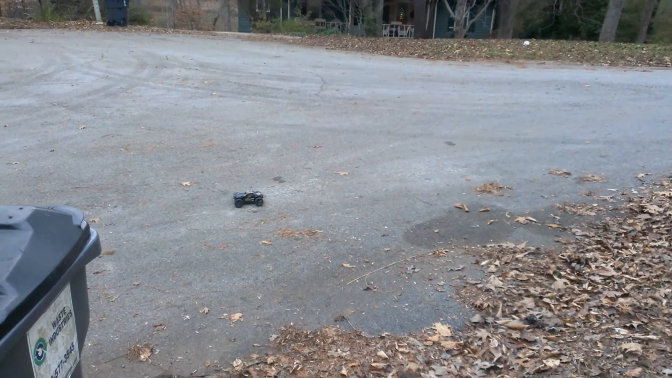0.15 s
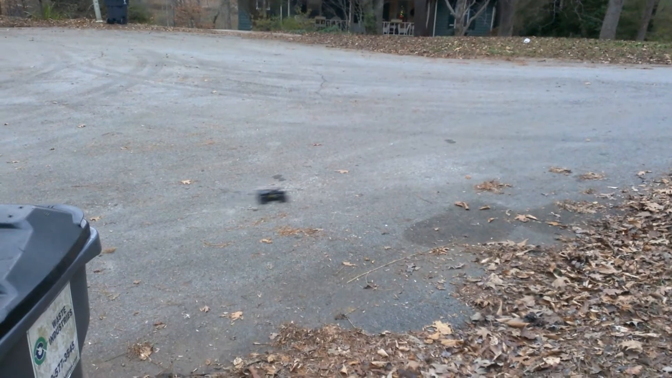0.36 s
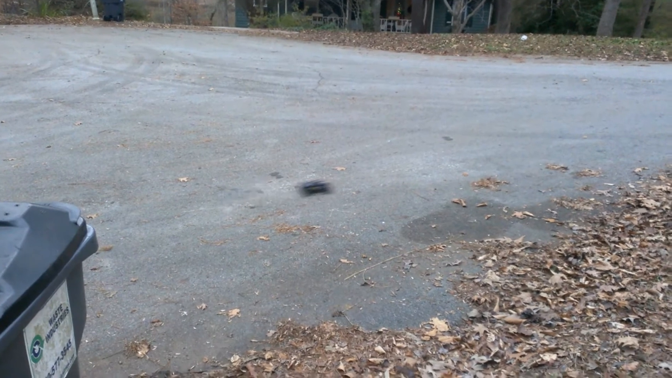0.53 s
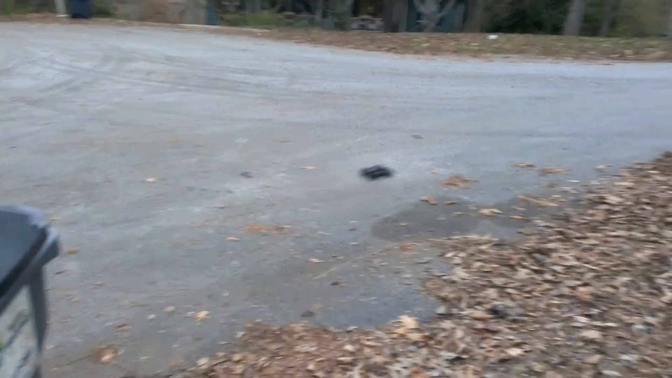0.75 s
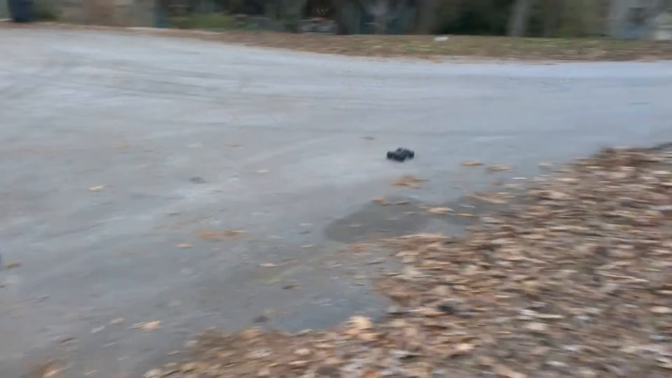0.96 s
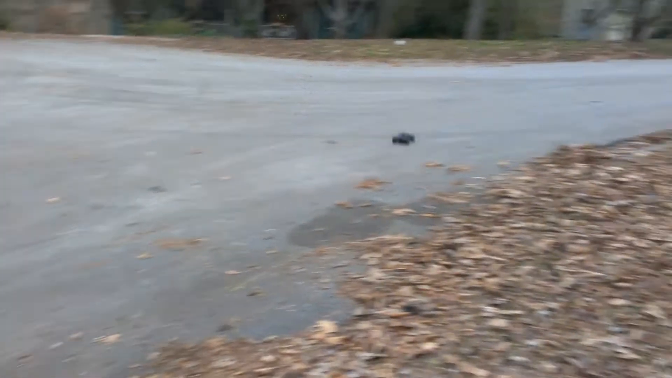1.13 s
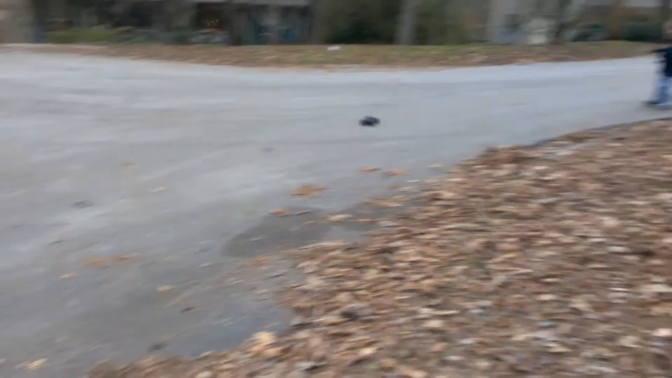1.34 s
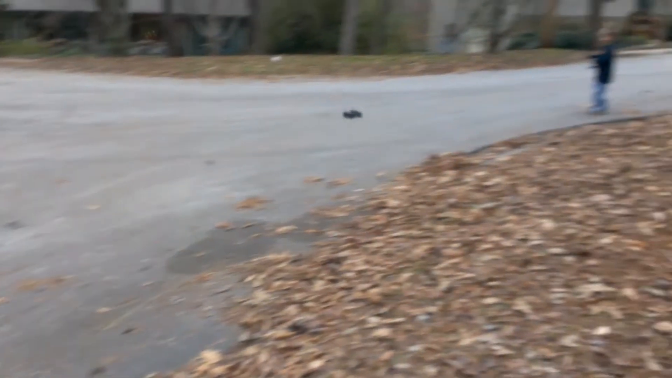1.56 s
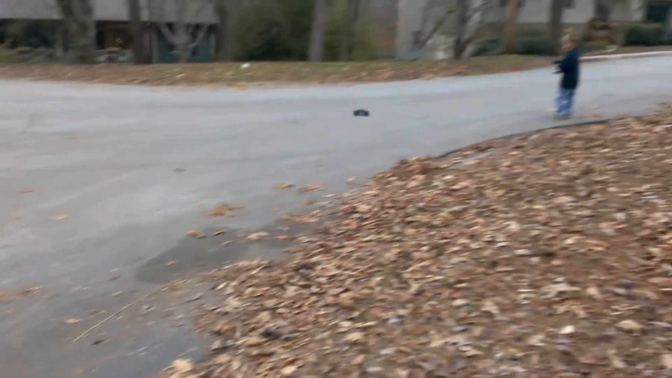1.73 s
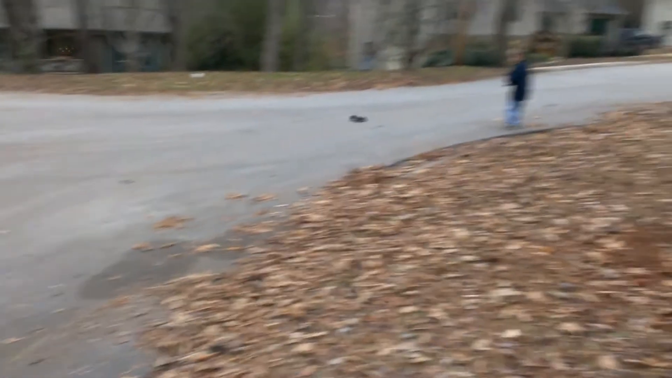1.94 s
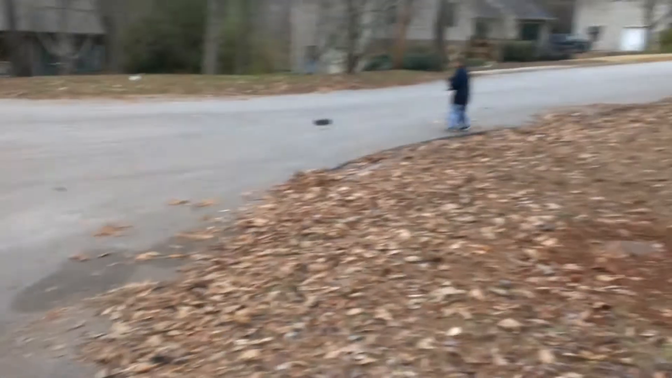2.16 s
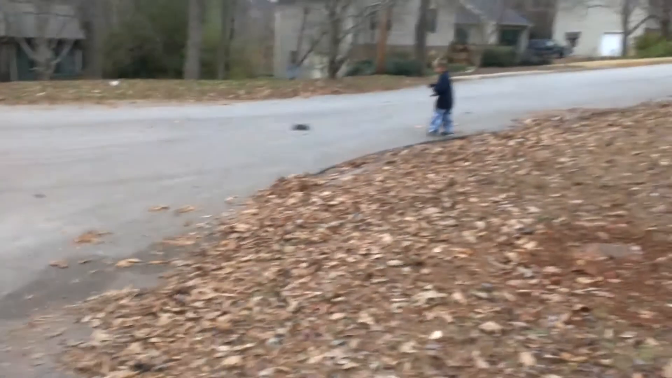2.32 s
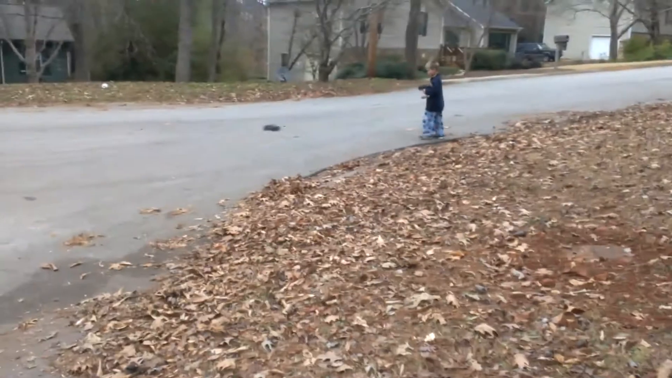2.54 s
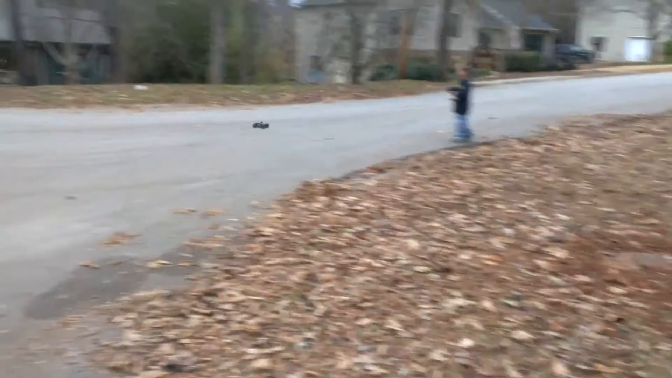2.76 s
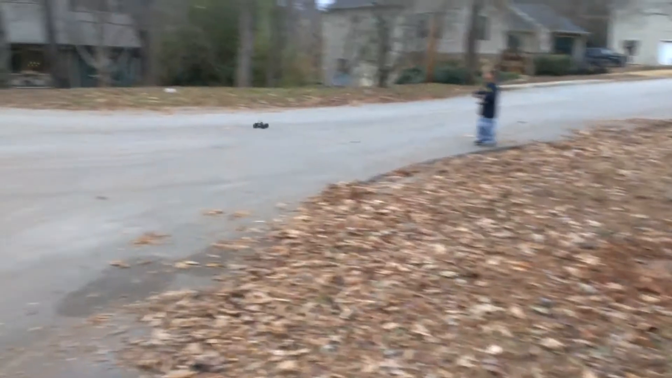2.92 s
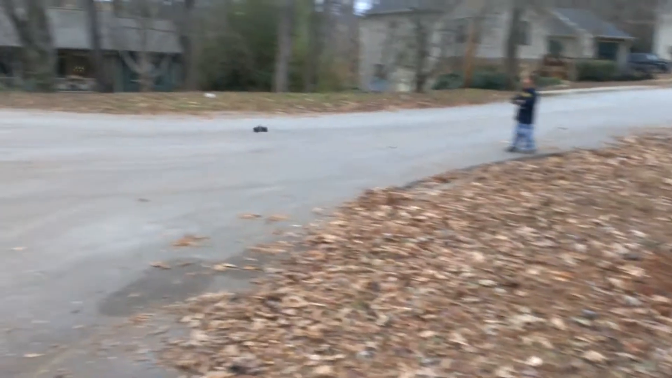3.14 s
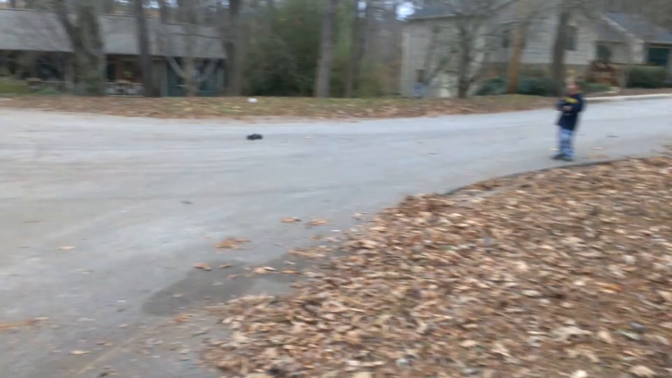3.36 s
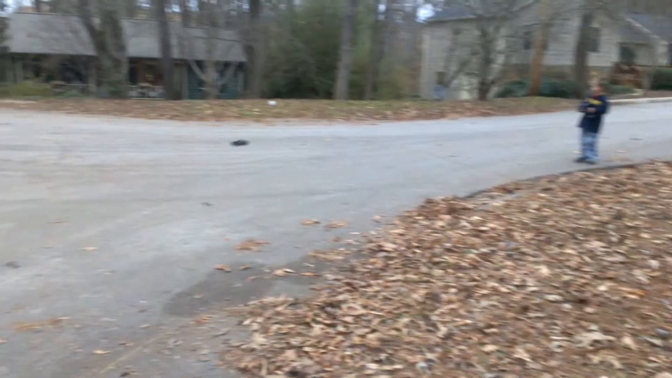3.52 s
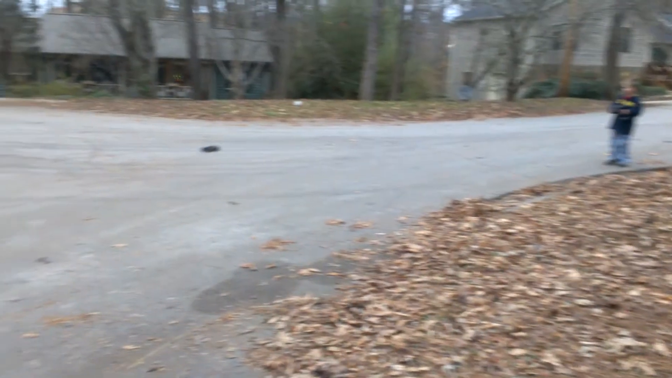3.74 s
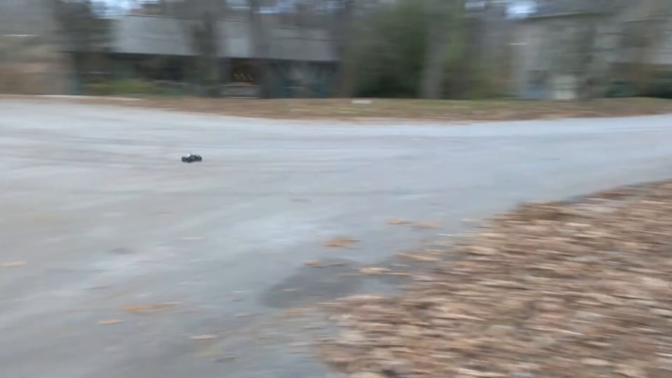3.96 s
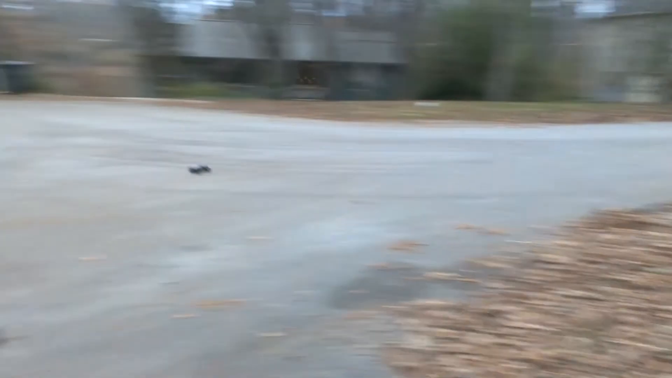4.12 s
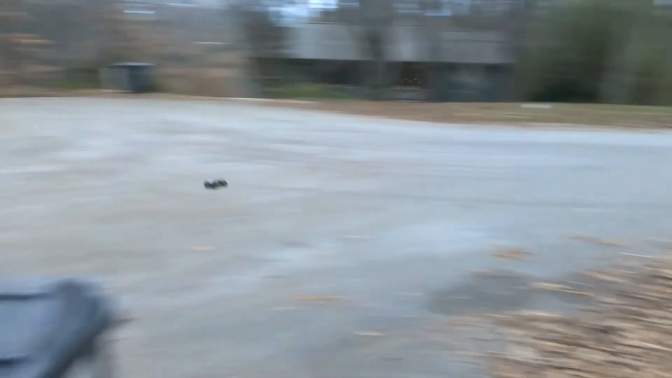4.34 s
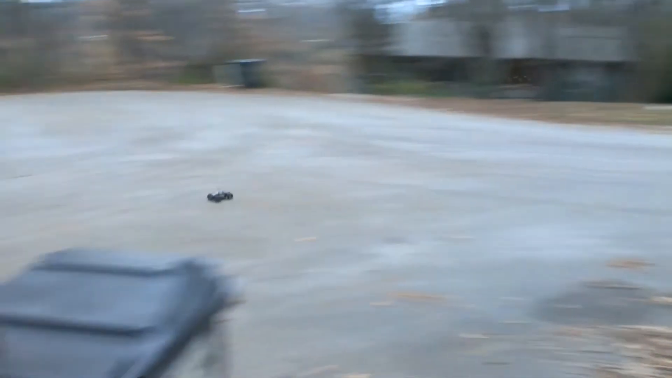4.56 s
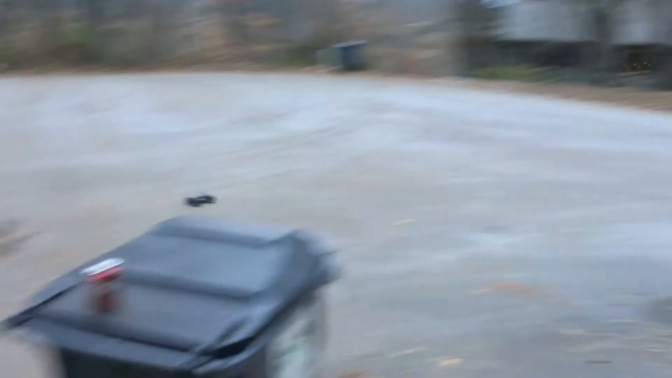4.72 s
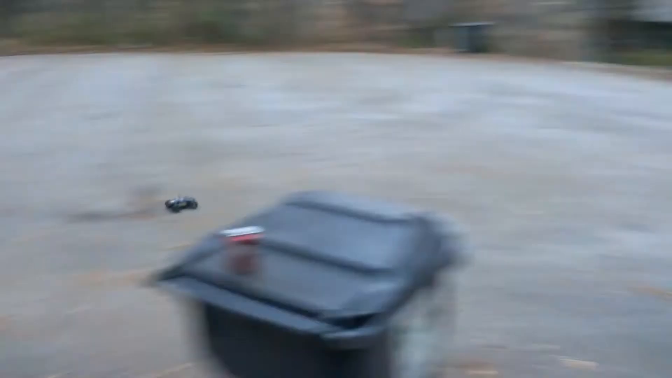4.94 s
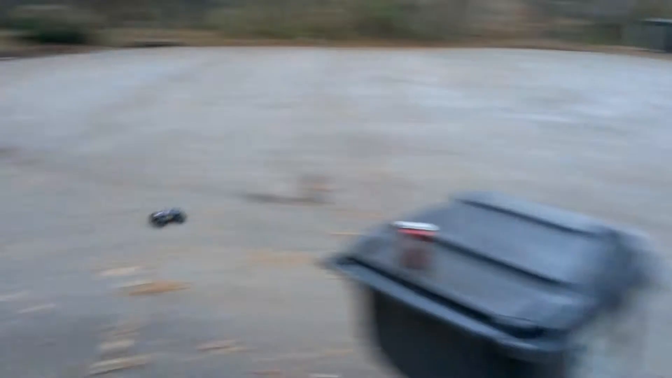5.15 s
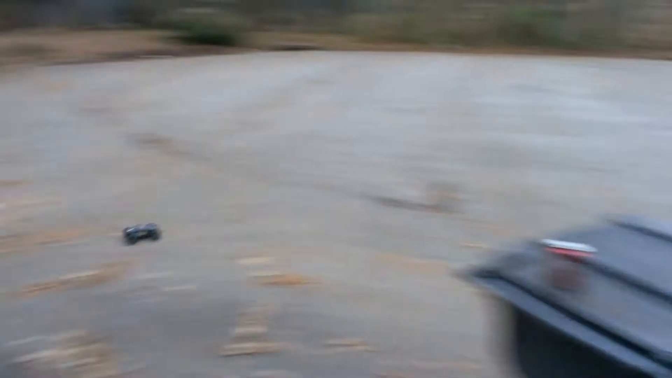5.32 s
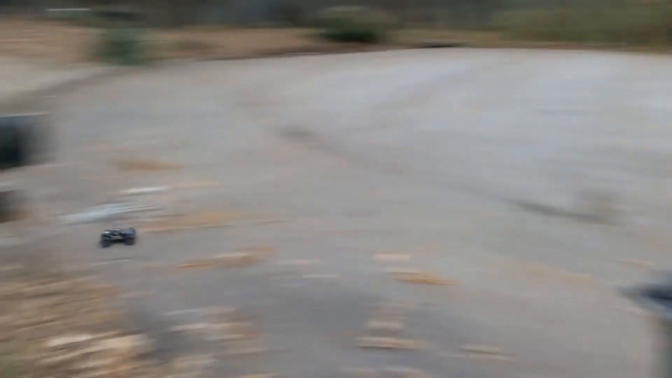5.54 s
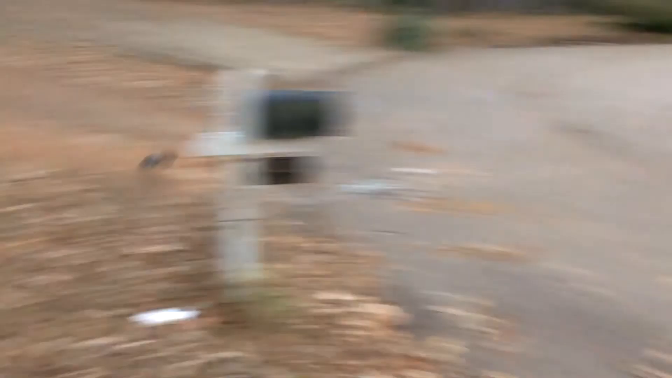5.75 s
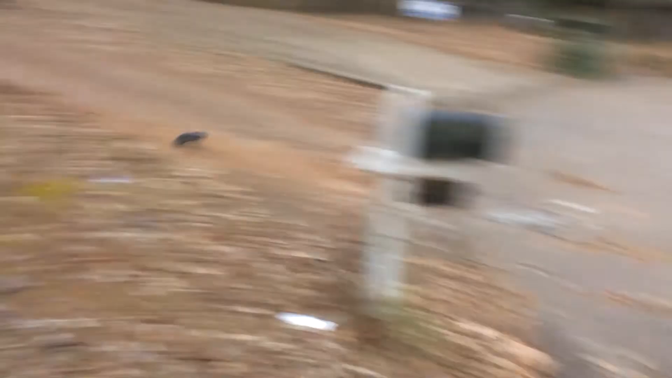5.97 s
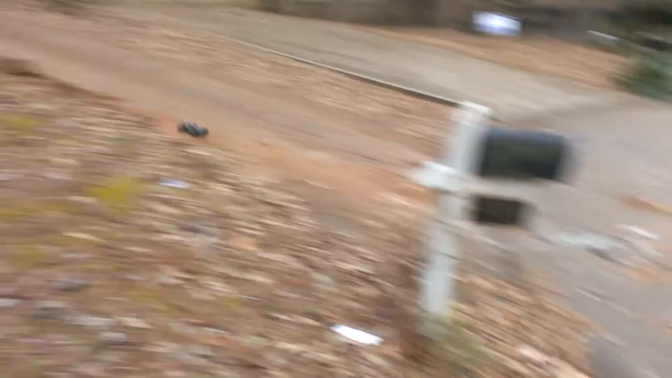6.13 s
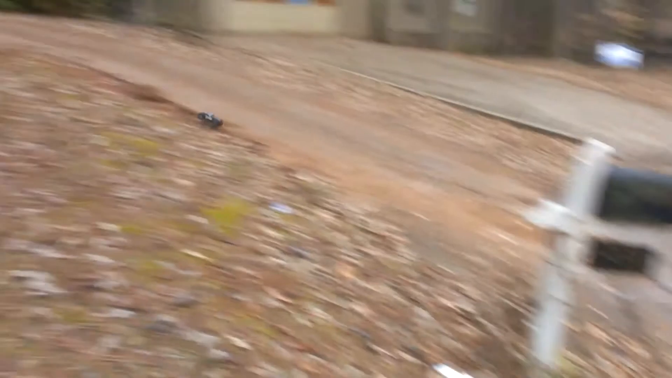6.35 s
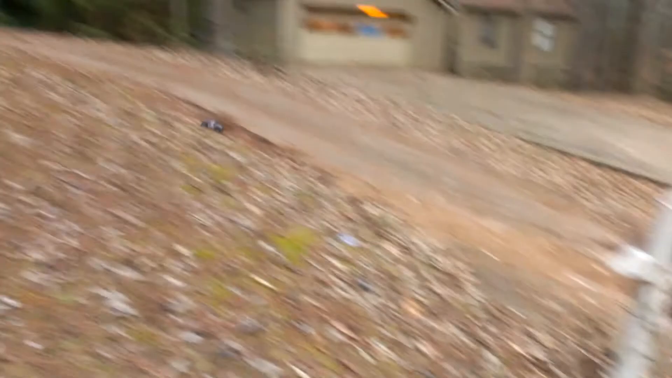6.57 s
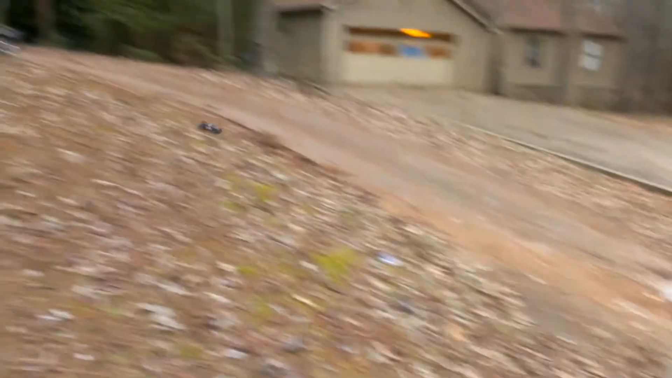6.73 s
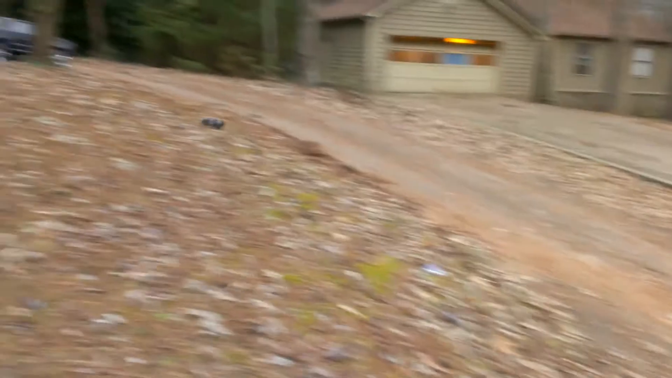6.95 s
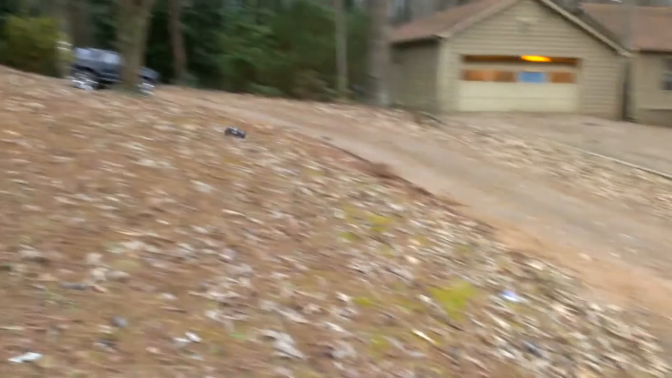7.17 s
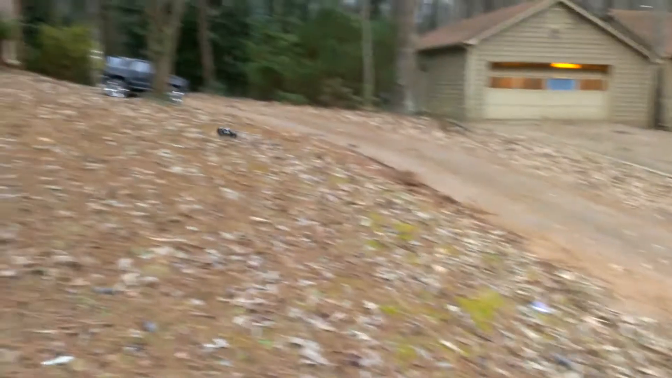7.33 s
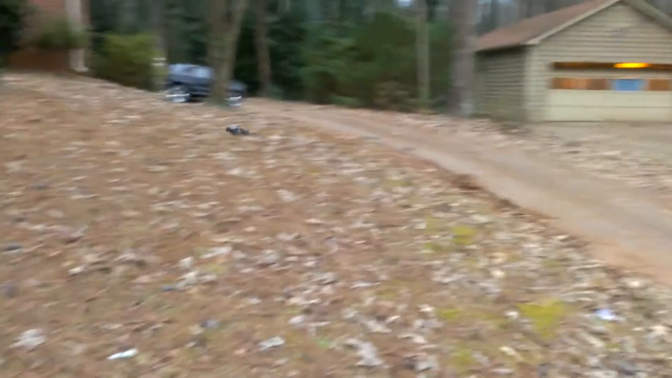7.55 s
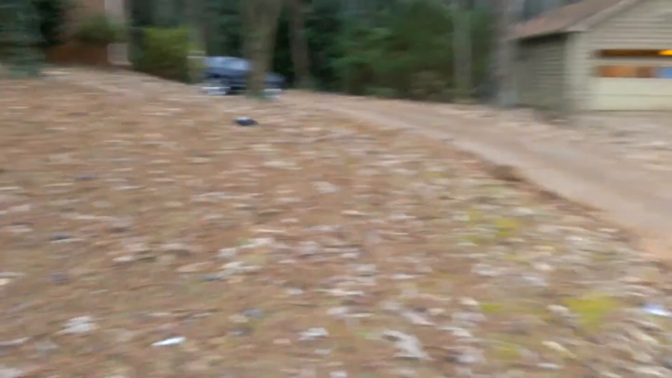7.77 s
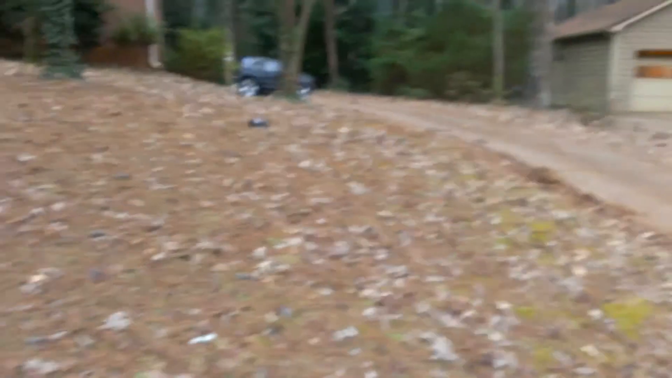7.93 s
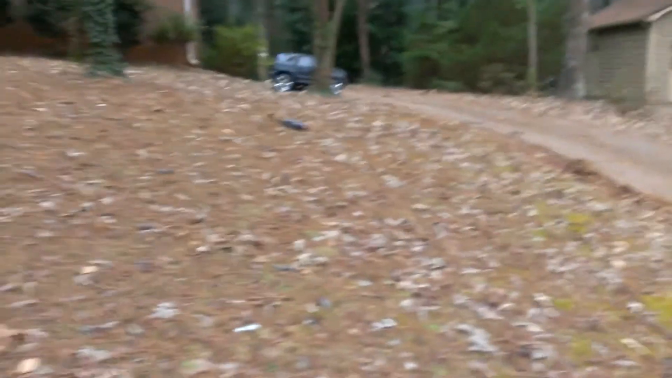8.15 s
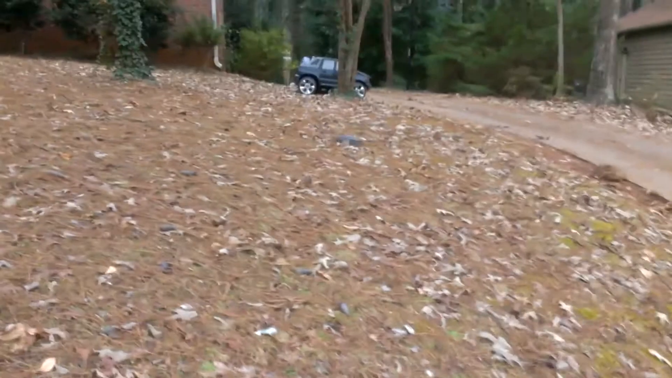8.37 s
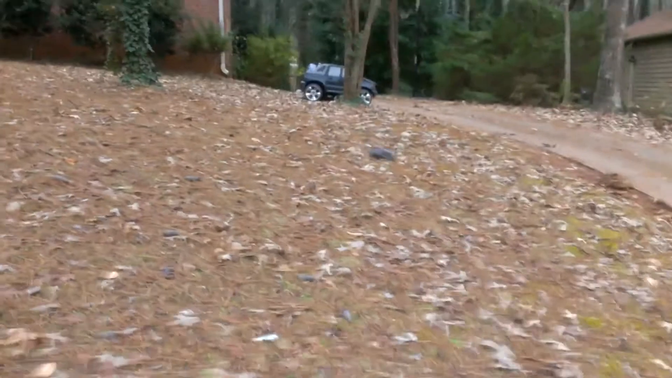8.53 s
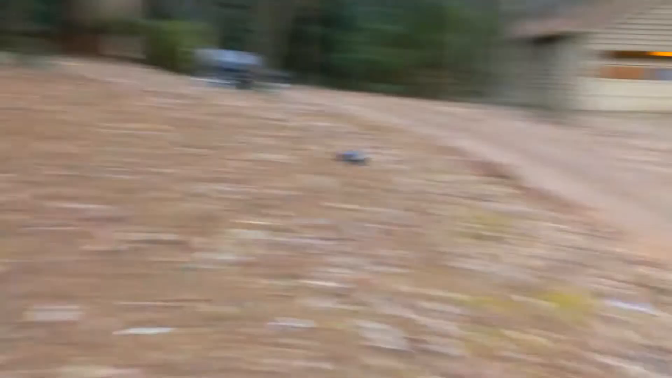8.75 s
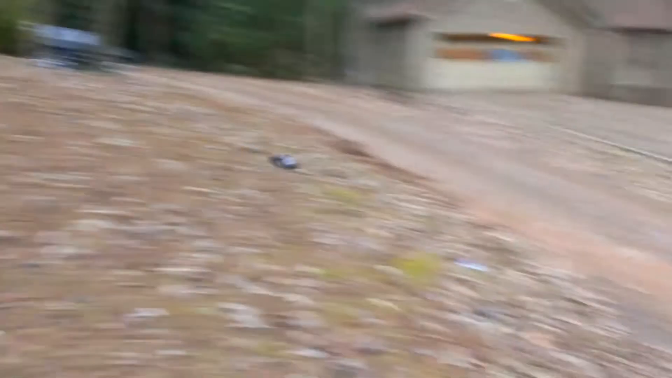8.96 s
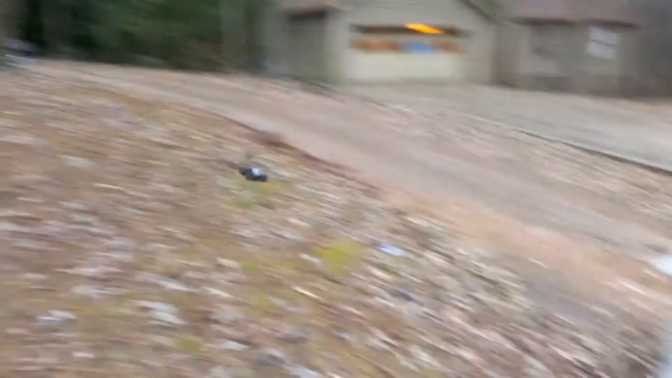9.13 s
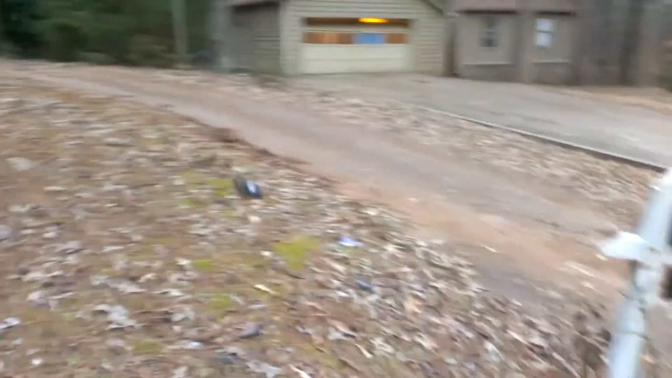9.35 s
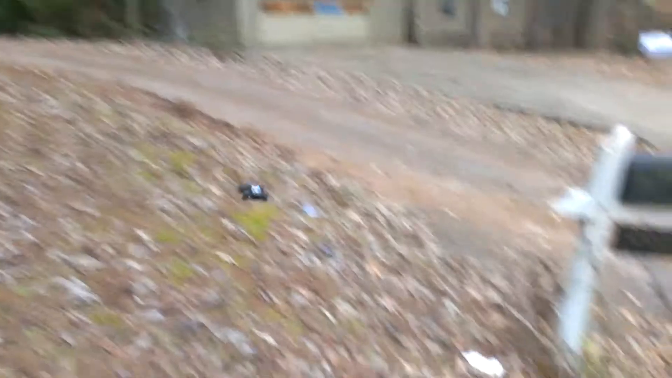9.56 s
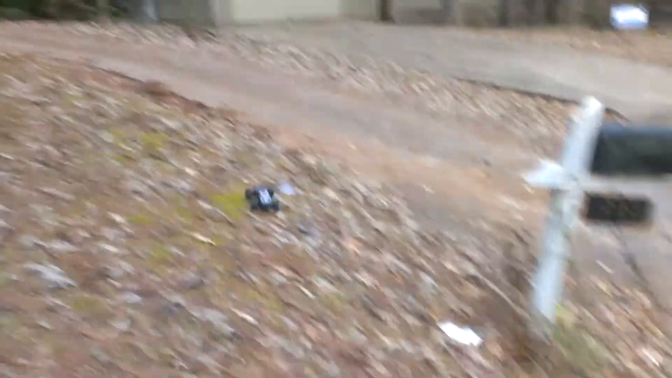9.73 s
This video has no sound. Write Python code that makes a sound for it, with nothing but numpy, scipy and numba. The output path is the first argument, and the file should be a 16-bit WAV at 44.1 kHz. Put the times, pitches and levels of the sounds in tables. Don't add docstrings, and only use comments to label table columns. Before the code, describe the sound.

Toy vehicle motor buzzes, climbs to a throbbing gear whine over rough pavement, dips and rises again, then ploughs noisily through crackling leaves.

```python
import sys
import numpy as np
from scipy import signal
from scipy.fft import rfft, irfft
from scipy.io import wavfile
from scipy.ndimage import uniform_filter1d
from numba import njit

SR = 44100
rng = np.random.default_rng(int(sys.argv[2]) if len(sys.argv) > 2 else 0)


def pcm_store(signal):
    levels = np.round(np.clip(np.atleast_2d(signal), -1, 1) * 32767)
    wavfile.write(sys.argv[1], SR, levels.astype(np.int16).T)


def ratio(d):
    e = np.asarray(d, float) / 20
    return 10 ** e


N = 431738
FREQ = np.arange(N // 2 + 1) * SR / N + 1e-3

# frequency in Hz, level in dB.
SUBURB = [(25, -40), (70, -15.5), (170, -11.5), (300, -10), (900, -10.5), (1700, -21), (4000, -28.5),
          (8800, -27.5), (16000, -31)]
# start in seconds, peak in dB.
SNAPS = [(.1296, -46), (.197, -40), (2.262, -27), (7.05, -31), (7.168, -31), (7.359, -28), (5.612, -20),
         (9.398, -22), (9.427, -16), (9.464, -20), (9.487, -20), (9.589, -19), (9.749, -19), (5.337, -17.5),
         (5.978, -28), (6.102, -24), (6.2194, -24), (6.414, -27), (6.9194, -25), (8.018, -36), (8.085, -27),
         (8.1434, -11)]
# time in seconds, pitch in Hz, level in dB.
STALL = [
    (0.17, 1370, -86),
    (0.202, 1353, -50.5),
    (0.33, 1383, -66),
    (0.474, 1295, -39),
    (0.574, 1414, -51),
    (0.64, 1280, -45),
]
# time in seconds, effort in dB, loose litter under the wheels from 0 to 1.
ROLL = [(.19, -62.5, 0), (.54, -31.5, 0.07), (.8, -23.5, 0), (1.12, -27.5, 0.15), (2.14, -26.5, 0),
        (2.46, -37.5, 0), (3.26, -39.5, 0.06), (3.42, -33.5, 0.15), (4.25, -28, 0.27), (4.65, -26.5, 0.28),
        (4.87, -34.5, 0.61), (5.19, -30, 0.75), (5.97, -27.5, 0.57), (6.5, -46.5, 0.91), (7.9, -37.5, 1),
        (8.16, -29, 0.98), (8.7, -32.5, 0.95), (9.79, -29.5, 0.92)]
# middle in seconds, length in seconds, change in dB.
LURCHES = [(0.31, 0.23, -6.5), (1.648, .04, 2.5), (2.727, 0.13, 5), (2.875, 0.16, -4.5),
           (3.182, 0.086, 4.5), (3.254, 0.1, -6), (3.757, 0.34, -2.5), (5.632, 0.032, -6),
           (5.725, 0.04, -6), (6.051, 0.09, -3.5), (6.121, 0.14, -2.5), (6.26, 0.15, -6),
           (6.403, 0.18, 6.5), (6.59, 0.36, -4.5), (7.14, .05, -5), (7.601, .06, -5), (9.725, .05, -4),
           (2.275, .03, -6), (6.94, 0.089, 8.5), (7.31, 0.19, 9.5), (7.391, 0.07, -7), (7.463, 0.22, 1),
           (7.815, 0.11, 1), (7.972, 0.32, -14.5), (8.061, 0.099, -8), (8.807, 0.12, -10),
           (8.963, 0.06, -3), (9.077, 0.23, 7.5), (9.295, 0.17, -11.5), (9.502, 0.5, 5.5), (2.387, 0.12, 5)]
# middle in seconds, length in seconds, change in dB.
AIRBORNE = [
    (6.1, 0.065, -21),
    (5.472, 0.025, -12),
    (5.11, .1, -2.5),
    (5.2, 0.058, -9),
]
# time in seconds, flank towards the listener and nose towards the listener (about -1 to 1).
HEADING = [(.35, 1.95, -0.41), (.6, -1.04, 0.15), (1.15, 0.15, 0.49), (1.85, 0.34, 0.17),
           (2.15, -0.51, 0.61), (2.75, -.4, -0.51), (3.42, -0.17, 0.013), (3.8, 0.11, -0.27),
           (4.4, 0.081, -0.99), (4.9, 1, -0.2), (5.6, 0.58, 1.34), (5.78, -0.97, 0.23), (6.3, 0.67, -0.4),
           (7.6, -0.061, 0.15), (8.2, -0.41, 0.8), (8.72, -0.36, 1.1), (9.0, -0.34, -0.00018),
           (9.6, 0.19, -0.7)]
# frequency in Hz, width in Hz, level in dB.
DRUM = [(685, 130, 1.5), (1000, 355, 4.5), (1330, 39, -3)]
AXLE = [(1742, 266, 10), (2050, 610, 7.5), (2360, 67, -13)]
RATTLE = [(3210, 2260, 0.5), (4330, 960, 6.2), (5660, 440, 0.5), (6190, 410, 3.9)]
RUMBLE = [(180, 230, -16), (317, 450, 23), (472, 490, -21)]
THUD = [(270, 120, 2.5), (596, 1300, -0.5), (880, 130, -2)]
BRUSH = [(2890, 590, 0)]
# frequency in Hz, level in dB.
LEAVES = [(4350, 9), (7400, 4.5), (7620, -2), (8230, 2.5), (9930, -3.5), (11600, -2.5), (13100, -7.5),
          (15100, -7), (16000, -5)]
# start in
# seconds, peak in dB.
CHATTER = [(1.6182, -12.5), (1.644, -23), (1.6881, -30), (1.7816, -9), (1.854, -10.5), (1.924, -7.5),
           (1.9824, -10.5), (2.0398, -13), (2.1771, -6.5), (2.2358, -10.5), (2.252, -13), (2.2934, -9.5)]
CRACKS = [(0.195, -35), (0.3564, -43), (0.3904, -46), (5.0432, -12), (5.1518, -11.5), (5.2325, -14.5),
          (5.3213, -14), (5.4194, -21), (5.4814, -19), (5.6695, -12), (8.4498, -14), (8.533, -20),
          (8.7555, -18)]
RUTS = [(2.661, -36), (5.653, -19.5), (5.9562, -35), (5.977, -34.5), (6.1, -31), (6.19, -39),
        (6.2198, -38.5), (6.25, -42.5)]
SCRAPES = [(5.747, -44), (6.4131, -42), (8.0863, -38), (8.184, -32), (8.3025, -17), (8.6916, -17)]
# the landings, low thud in dB over the peak, decay in seconds.
LANDINGS = [(CHATTER, -66, 0.076), (CRACKS, -21, 0.072), (RUTS, -1.3, 0.11), (SCRAPES, -22, 0.089)]
# time in seconds, tooth rate in Hz, drive in dB, tooth load in dB that lifts upper partials.
GEAR = [(0.58, 651, -71, 10), (0.63, 680, -51.5, 16.5), (0.74, 754, -45, 18), (.86, 840, -34, 6),
        (1.01, 948, -30.5, -2), (1.11, 1015, -31.5, 3.5), (1.26, 1039, -31, 6.5), (1.42, 1092, -31.5, -1.5),
        (1.55, 1191, -33.5, 3.5), (1.75, 1220, -34.5, 3), (1.83, 1029, -34.5, -4), (2.18, 997, -37, 13),
        (2.31, 720, -43, -9), (2.36, 632, -38, 12.5), (2.46, 569, -59, 4), (2.57, 595, -65, 11),
        (2.75, 729, -56, 18), (2.8, 746, -66, -5), (3.2, 684, -54, -5), (3.33, 728.5, -52, 8),
        (3.48, 907, -41, 5.5), (3.75, 1047, -32.5, -2), (4.0, 1187, -30.5, -2.5), (4.3, 1308, -33.5, 8.5),
        (4.62, 1399, -34, 1), (4.8, 1410, -47, -4), (5.61, 1343, -42, -6), (5.74, 966, -58, -10),
        (9.79, 899, -83, 0)]
# middle in seconds, length in seconds, tooth rate in Hz, drive in dB.
SPINS = [(9.098, 1.55, 949.5, -57.5), (6.099, 0.86, 954, -51), (9.6, 0.6, 1000, -54),
         (0.47, 0.3, 1005, -41), (5.821, .2, 960, -49.5), (5.951, 0.074, 920, -34.5),
         (6.11, 0.073, 984, -39), (6.214, 0.052, 1014, -37), (6.285, 0.056, 1027, -43),
         (6.332, 0.046, 1090, -33), (6.371, .07, 1026, -33), (6.419, 0.048, 1017, -33.5),
         (6.472, 0.049, 1138, -43), (6.514, 0.051, 950, -47), (6.584, 0.065, 948, -49),
         (6.622, 0.037, 870, -54), (6.726, .06, 1000, -52), (6.95, .1, 880, -53), (8.461, .05, 880, -44),
         (8.563, 0.17, 886, -38), (8.658, 0.046, 900, -41), (8.76, 0.058, 902, -36.5),
         (8.827, .06, 1058, -34.5), (8.867, 0.065, 1169, -34), (8.905, 0.059, 1000, -38),
         (8.952, 0.054, 904, -42.5), (9.018, .07, 1020, -40), (9.14, 0.0746, 896, -42),
         (9.19, 0.0773, 1018, -38.5), (9.225, 0.0411, 1130, -39), (9.26, 0.069, 920, -42.5),
         (9.37, .05, 1093, -38), (9.417, .07, 1063, -37), (9.476, .08, 838, -46),
         (9.513, 0.0496, 1000, -40.5), (9.6, .11, 985, -42.5), (9.673, 0.057, 1000, -38),
         (9.721, 0.053, 952, -35.5), (9.769, .08, 1083, -36)]
# time in seconds, raggedness from 0 (clean) to 1 (all noise),
# throb depth from 0 to 1, leaf cover from 0 to 1.
RAGGED = [(0, .4, .3, 0), (.62, .3, .8, 0), (.85, .28, .9, 0), (1.1, .3, .55, 0), (1.45, .33, .5, 0),
          (1.7, .45, .8, .1), (1.8, .8, .4, .2), (2.35, .55, .3, .1), (2.75, .45, .3, .1),
          (2.85, .7, .4, .3), (3.3, .55, .4, .1), (3.65, .42, .25, 0), (4.05, .48, .3, 0),
          (4.4, .85, .3, .1), (5.6, 1, .3, .3), (5.9, .8, .2, .7), (6.15, .75, .15, 1), (6.3, .7, .3, 1),
          (6.55, .75, .15, 1), (8.4, .55, .2, .8), (9.3, .62, .25, .8), (9.79, .68, .25, .8)]
# frequency in Hz, level in dB.
RADIATION = [(560, -18), (720, -5.5), (1000, 0.5), (1220, -7), (1450, -12), (2120, -4), (2800, -10.5),
             (3250, -3), (3950, -3)]
# middle in seconds, length in seconds, frequency at start in Hz, frequency at end in Hz, level in dB.
PANELS = [(3.651, 0.92, 4220, 4800, -37), (3.496, 0.51, 6180, 5830, -41), (3.63, 0.99, 1930, 2270, -41),
          (2.69, 0.19, 1740, 2200, -42), (2.37, 0.1, 1870, 1710, -41), (2.37, 0.054, 5600, 5450, -37.5),
          (4.95, 0.37, 4500, 4440, -37.5), (4.95, 0.32, 6300, 6100, -41), (4.86, 0.29, 754, 746, -38.5),
          (6.37, 0.13, 4300, 3950, -37), (9.52, .35, 4000, 4140, -35), (9.55, .3, 6800, 6650, -35),
          (7.5, 0.93, 4830, 5070, -44.5), (7.43, 0.99, 6760, 6540, -47), (0.359, .03, 1050, 1000, -39.5),
          (3.85, .35, 2120, 2250, -35), (.53, .16, 4200, 4900, -39), (2.24, .1, 6200, 5700, -33),
          (0.963, 0.43, 5560, 5370, -31), (1.975, 0.54, 1990, 1860, -34), (4.2, 0.47, 6400, 6000, -48),
          (1.5, .5, 3040, 4450, -47), (1.57, 1, 5650, 5630, -39), (1.4, 0.63, 2220, 2130, -37.5),
          (2.64, .4, 3530, 3620, -42.5), (5.04, 0.1, 810, 800, -36), (5.2, .2, 1090, 960, -36.5),
          (5.332, 0.035, 660, 810, -37), (5.43, 0.06, 710, 700, -30.5), (5.505, 0.072, 840, 810, -31.5),
          (5.562, 0.086, 670, 745, -35.5), (5.602, 0.044, 704, 660, -36.5), (8.5, 0.81, 5150, 5460, -34),
          (8.85, 0.29, 5600, 6400, -37.5)]
MORE_PANELS = [(5.672, .025, 5600, 5200, -26), (5.752, .025, 5200, 5000, -32), (1.565, .04, 3940, 3440, -28.5),
               (1.63, 0.046, 3430, 3600, -28), (1.695, .04, 3750, 3300, -28), (6.212, 0.025, 3530, 2800, -36),
               (6.413, 0.024, 3600, 2560, -40), (7.3, .025, 2400, 2150, -49), (8.31, 0.05, 2760, 2700, -30),
               (5.83, 0.12, 3700, 3470, -32), (4.75, 1, 11900, 12100, -56), (5.4, 0.94, 9100, 9000, -51.5)]
# time in seconds, low, middle and high band in Hz,
# evenness of the ground from 0 to 1.
GROUND = [(.3, 3060, 4970, 7000, 1), (1.25, 2610, 5110, 7440, 1), (2.4, 2870, 4702, 6570, 1),
          (3.3, 2958, 4840, 6223, 1), (3.45, 2460, 5200, 6700, 0.58), (4.1, 2890, 5770, 6944, 0.03),
          (5.2, 2595, 6350, 8300, 0), (5.8, 2800, 6650, 7840, 0.35), (6.5, 2860, 5620, 7266, 0.4),
          (8.25, 2830, 7340, 8500, 0.12), (8.5, 2700, 7520, 8700, 0.9), (9.0, 2813, 7580, 8900, 0.99),
          (9.4, 2860, 7710, 8804, 0.6), (9.79, 2940, 7800, 8840, 0.5)]
# width in Hz, depth from 0 to 1.
CANCEL = [(380, .95), (330, .65), (450, .9)]
# middle in seconds, length in seconds, frequency in Hz, width in Hz,
# depth from 0 to 1.
HIDDEN = [(1.25, .9, 1650, 450, .85), (5.9, .4, 1700, 500, .7), (8.85, 1.3, 2790, 260, .9),
          (1.17, .35, 4800, 250, .8), (3.85, .9, 5350, 600, .6), (3.9, .5, 1500, 300, .6),
          (2.9, .9, 2950, 300, .8), (3.0, .7, 5700, 700, .5), (1.25, .5, 3850, 300, .6),
          (6.35, .3, 1500, 500, .6), (3.6, .6, 3950, 500, .4), (8.7, .7, 1800, 900, .4),
          (2.25, .4, 2700, 500, .6), (4.5, 1.8, 14500, 2500, .7), (7.3, 1.4, 5800, 600, .55),
          (9.07, .3, 8500, 2500, .5), (4.9, .3, 3400, 400, .7)]
# frequency in Hz, likeness from 0 to 1.
LIKENESS = [(60, .8), (200, .94), (700, .96), (1400, .9), (2800, .76), (5500, .58), (10000, .2),
            (15000, .15)]
# frequency in Hz, left minus right in dB.
BALANCE_DB = [(100, -.5), (700, .1), (1400, 1), (2800, 3.5), (5000, 3.8), (9000, 1.8), (15000, 1)]
# frequency in Hz, lead of the left in radians.
LEAD = [(950, -.1), (1460, -1), (1900, -.6), (3500, -.4), (4400, -.9), (7000, -.6)]
# time in seconds, left minus right in dB, taken about its average over the
PAN = [(0.0, 8.5), (1.66, 5), (1.99, 6), (4.31, 8.5), (4.99, 8), (5.56, 9), (7.82, 6), (9.79, 5.5)]
# frequency in Hz, width in Hz, depth from 0 to 1.
NOTCHES = [(1510, 1800, 0.09)]

SHELL_TOP_HZ = 6600
WANDER = .035


def level(x, db):
    return x * ratio(db) / np.sqrt(np.mean(x ** 2))


def curves(table):
    s, *columns = np.transpose(table)
    return [np.interp(np.arange(N) / SR, s, c) for c in columns]


def on_freq(points):
    hz, value = np.transpose(points)
    return np.interp(np.log(FREQ), np.log(np.maximum(hz, 1)), value)


def walk(rate):
    k = max(int(SR / rate), 1)
    steps = np.repeat(rng.standard_normal(N // k + 1), k)
    return 1.1 * uniform_filter1d(uniform_filter1d(steps, k), k)[:N]


def swell(s, length):
    out = np.zeros(N)
    i = np.arange(max(int((s - length / 2) * SR), 0), min(int((s + length / 2) * SR), N))
    out[i] = np.cos(np.pi * (i / SR - s) / length) ** 2
    return out


def ring(x, modes):
    power = sum(ratio(db) ** 2 / (1 + ((FREQ - hz ** 2 / FREQ) / w) ** 2) ** 2 for hz, w, db in modes)
    return irfft(rfft(x) * np.sqrt(power), N)


@njit
def svf(x, hz, width):
    y, b, l = np.empty(len(x)), 0., 0.
    for i in range(len(x)):
        g, k = np.tan(np.pi * hz[i] / SR), width[i] / hz[i]
        v = (b + g * (x[i] - l)) / (1 + g * (g + k))
        b, l, y[i] = 2 * v - b, l + 2 * g * v, k * v
    return y


def moving(x, hz, width, db):
    hz = np.clip(hz, 300, 8000)
    widen = 1 + 1.5 * curves(RAGGED)[2]
    once = svf(x, hz, width * widen)
    return level(svf(once, hz, width * widen) / np.sqrt(widen), db)


def grit(per_s, spread_db, hiss_db):
    size_db = spread_db * np.minimum(rng.exponential(size=N), 3)
    clicks = (rng.random(N) < per_s / SR) * rng.standard_normal(N) * ratio(size_db)
    return level(level(clicks, 0) + ratio(hiss_db) * rng.standard_normal(N), 0)


def partials(hz, layers, ragged):
    phase, out = 2 * np.pi * np.cumsum(hz) / SR, 0
    for order, db, smear in layers:
        share = np.clip(ragged * np.sqrt(order), 0, 1)
        drift = (walk(smear) + 1j * walk(smear)) / np.sqrt(2)
        wander = np.sqrt(1 - share ** 2) + share * drift
        out = out + ratio(db) * np.real(wander * np.exp(1j * order * phase))
    return np.sqrt(2) * out


def tooth_rate():
    hz, drive_db = curves(GEAR)[:2]
    drive = ratio(drive_db)
    for s, length, spin_hz, db in SPINS:
        shape = swell(s, length)
        hz = hz + np.sqrt(shape) * (spin_hz - hz)
        drive = drive + shape * ratio(db)
    return hz, 20 * np.log10(drive)


def suburb():
    hum = irfft(rfft(rng.standard_normal(N)) * ratio(on_freq(SUBURB)), N)
    return level(hum, -58) * ratio(1.5 * walk(1.22))


def snaps():
    clicks = np.zeros(N)
    for s, db in SNAPS:
        clicks[int(s * SR)] = ratio(db + 16)
    return signal.sosfilt(signal.butter(3, [2000, 7000], "bandpass", fs=SR, output="sos"), clicks)


def stall():
    hz, db = curves(STALL)
    t = np.arange(N) / SR
    buzz = partials(hz, ((1, db + 3.0, 210.0), (2, db - 0.5, 200.)), ragged=0.96)
    return buzz * (t > STALL[0][0]) * (t < STALL[-1][0])


def leaves():
    crackle = irfft(rfft(grit(7000, 2.7, hiss_db=-1.5)) * ratio(on_freq(LEAVES)), N)
    out = np.zeros(N)
    for hz in np.geomspace(6000, 15500, 9):
        band = svf(crackle, hz * (1 + .035 * walk(1.5)), np.full(N, hz / 8))
        out += band * ratio(3.5 * walk(4.5) + 1.3 * walk(30))
    return level(out, 0.13)


def rolling(turn):
    effort_db, litter = curves(ROLL)
    flank, nose = curves(HEADING)
    cover = curves(RAGGED)[2]
    tooth_hz = tooth_rate()[0]
    lurch_db = sum(db * swell(s, length) for s, length, db in LURCHES)
    rattle_db = effort_db + lurch_db

    drum_db = -4.5 + 7.5 * flank + cover * (-5.5 - 0.43 * lurch_db)
    drum_db = drum_db + sum(db * swell(s, length) for s, length, db in AIRBORNE)
    axle_db = -9.5 + 4 * flank - 2 * nose + cover * (-4 - 0.098 * lurch_db)
    leaf_db = -23.5 + 23 * litter
    upper_db = 14 * nose

    drum_hz, lower_hz, upper_hz = 920, 3723, 4920
    drum_hz = drum_hz - 306 * litter * (1 - cover) + 0.024 * (tooth_hz - drum_hz)
    drum_hz = drum_hz * (1 + 2 * WANDER * walk(3.795))
    lower_hz = lower_hz + 0.15 * (1 - cover) * (3 * tooth_hz - lower_hz) - 120 * nose
    lower_hz = lower_hz * (1 + WANDER / 2 * walk(4))
    upper_hz = (upper_hz + 490 * nose) * (1 + WANDER / 2 * walk(4.23))
    axle_hz = 2127 * (1 + WANDER / 3 * walk(2.84))

    shake_db = rattle_db + 1.3 * walk(18) + 1.15 * walk(70) + 0.69 * turn
    shake_db = shake_db + 1.6 * cover * walk(45)
    low_pass = signal.butter(8, SHELL_TOP_HZ, fs=SR, output="sos")
    stones = signal.sosfilt(low_pass, grit(6000, 4.3, hiss_db=1.0))
    drum = level(ring(stones, DRUM), -9) + moving(stones, drum_hz, 415.0, -9.5)
    drum = drum * ratio(drum_db + 2.0 * walk(25))
    axle = level(ring(stones, AXLE), -7.5) + moving(stones, axle_hz, 350, -9)
    axle = axle * ratio(axle_db + 3.1 * walk(25))
    lower = moving(stones, lower_hz, 520., -10.5) * ratio(2.2 * walk(30) - upper_db / 2)
    upper = moving(stones, upper_hz, 750., -10.5) * ratio(3.4 * walk(30) + upper_db / 2)
    brush = cover * level(ring(stones, BRUSH), -15.5)
    rattle = level(ring(stones, RATTLE), -6.5) + lower + upper + brush

    slow_db = uniform_filter1d(rattle_db + drum_db, SR // 3)
    rumble = level(ring(rng.standard_normal(N), RUMBLE), -36.0)
    rumble = rumble * ratio(0.57 * slow_db + (cover - 0.3) + 2.0 * walk(7.8))
    moving_off = np.arange(N) > ROLL[0][0] * SR
    return moving_off * ratio(shake_db) * (drum + axle + rattle + ratio(leaf_db) * leaves()) + rumble


def hops():
    scrape, thud, t = np.zeros(N), np.zeros(N), np.arange(SR // 4) / SR
    for rows, low_db, decay_s in LANDINGS:
        rise = 1 - np.exp(-t / (0.11 * decay_s))
        fall = np.exp(-np.log(1000) * t / decay_s)
        for s, db in rows:
            i = int(s * SR)
            shape = (3 * rise * fall)[:N - i]
            scrape[i:i + len(t)] += ratio(db - 15.5) * shape
            thud[i:i + len(t)] += ratio(db + low_db - 5.0) * shape
    burst = grit(5000, 5.1, hiss_db=4.5)
    shell = level(ring(burst, RATTLE), -4) + level(ring(burst, AXLE), -5) + level(ring(burst, DRUM), -6)
    shell = signal.sosfilt(signal.butter(6, SHELL_TOP_HZ, fs=SR, output="sos"), shell)
    crisp = curves(ROLL)[1] ** 2 * level(np.diff(burst, prepend=0), -6)
    return scrape * (shell + crisp) + thud * level(ring(burst, THUD), .3)


def gearbox():
    teeth = 40
    hz, drive_db = tooth_rate()
    ragged, depth, cover = curves(RAGGED)
    hz = hz * (1 + .05 * cover ** 2 * walk(14))
    upper_db = curves(GEAR)[2] - 24 * cover ** 2
    turn = 2 * np.pi * np.cumsum(hz) / SR / teeth + .6 * walk(9)
    bend = 0.054 * depth * (1 + .9 * swell(0.75, 0.48)) * np.sin(turn + .7)
    bent = hz * (1 + bend + .045 * ragged ** 2 * walk(30))
    bent = bent * (1 + .07 * ragged ** 4 * walk(120))
    throb = 1 + depth * (np.sin(turn) + 0.65 * np.sin(2 * turn + 0.38))
    shell_hz, shell_db = np.transpose(RADIATION)
    layers = []
    for order, db, smear_hz in ((1, 3.0, 160.), (2, -9.5, 250.), (3, -1.5, 270.0), (4, -11.5, 250.)):
        out_db = drive_db + np.interp(np.log(order * hz), np.log(shell_hz), shell_db) + db
        if order > 1:
            out_db = out_db + upper_db
        layers.append((order, out_db, smear_hz))
    whine = throb * ratio(2. * walk(22)) * partials(bent, layers, ragged)
    return whine, depth * np.sin(turn)


def panels():
    stones = grit(5000, 2.4, hiss_db=-2.0) * ratio(4.1 * walk(45))
    out = np.zeros(N)
    for s, length, from_hz, to_hz, db in PANELS + MORE_PANELS:
        shape = swell(s, length)
        i = np.flatnonzero(shape)
        hz = np.linspace(from_hz, to_hz, len(i))
        width = 0.09 * hz
        tone = svf(svf(stones[i], hz, width), hz, width)
        out[i] += np.sqrt(shape[i]) * level(tone, db)
    return out


def ground(x):
    *bands, even = curves(GROUND)
    for hz, (width, depth) in zip(bands, CANCEL):
        x = x - np.clip(depth * even, 0, 1) * svf(x, hz, np.full(N, 1. * width))
    return x


def hide(x):
    for s, length, hz, width, depth in HIDDEN:
        shape = np.sqrt(swell(s, length))
        i = np.flatnonzero(shape)
        band = svf(x[i], np.full(len(i), 1. * hz), np.full(len(i), 1. * width))
        x = x - np.bincount(i, depth * shape[i] * band, N)
    return x


def scene():
    gear, turn = gearbox()
    truck = gear + stall() + rolling(turn) + hops() + panels()
    sound = hide(ground(truck)) + snaps() + suburb()
    like = np.clip(on_freq(LIKENESS), 0, 1)
    mid = rfft(sound) * np.sqrt((1 + like) / 2)
    side = 1j * rfft(sound * walk(120)) * np.sqrt((1 - like) / 2)
    tilt = ratio(on_freq(BALANCE_DB) / 2) * np.exp(.5j * on_freq(LEAD))
    pan_db, = curves(PAN)
    pan = ratio((pan_db - pan_db.mean()) / 2)
    left = irfft((mid + side) * tilt, N) * pan
    right = irfft((mid - side) / tilt, N) / pan
    return np.array([left, right])


def roll_off(x):
    return signal.sosfilt(signal.butter(12, 17110, fs=SR, output="sos"), x)


def record(dry):
    shade = 1
    for hz, width, depth in NOTCHES:
        shade = shade * (1 - depth / (1 + ((FREQ - hz) / width * 2) ** 2))
    low_hz, top_hz = 97, 15850
    shade = shade / (1 + (low_hz / FREQ) ** 4) ** 0.99 * (FREQ < top_hz)
    mix = irfft(rfft(dry, axis=1) * shade, N, axis=1)
    return roll_off(mix)


dry = scene()
out = record(dry)
pcm_store(out)
```